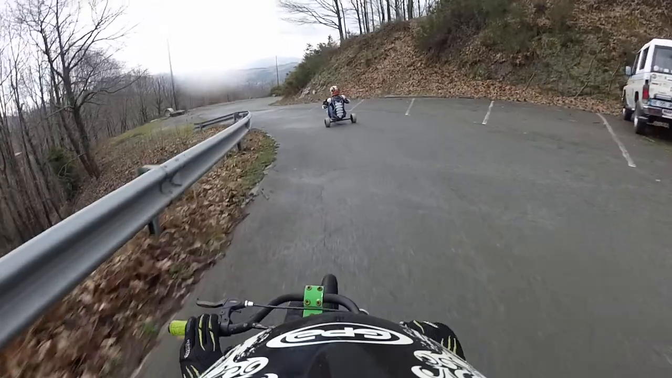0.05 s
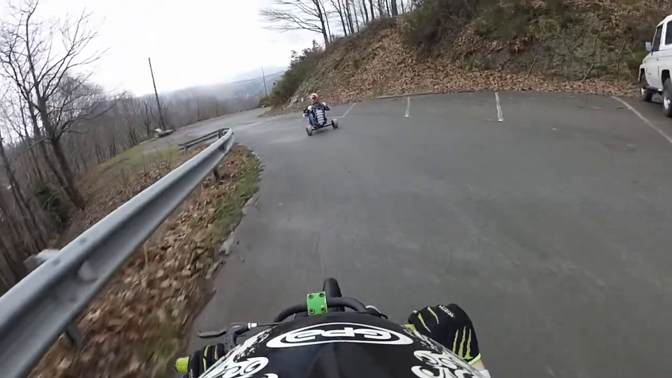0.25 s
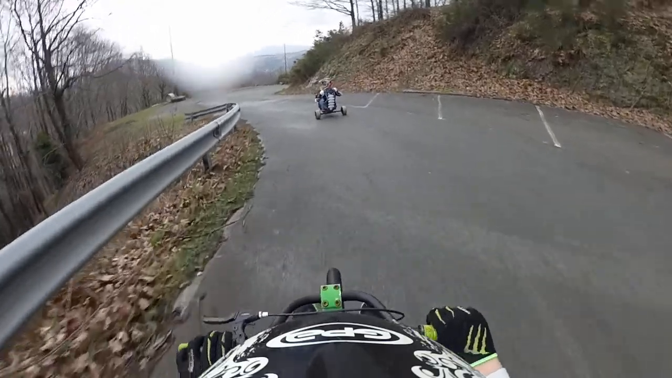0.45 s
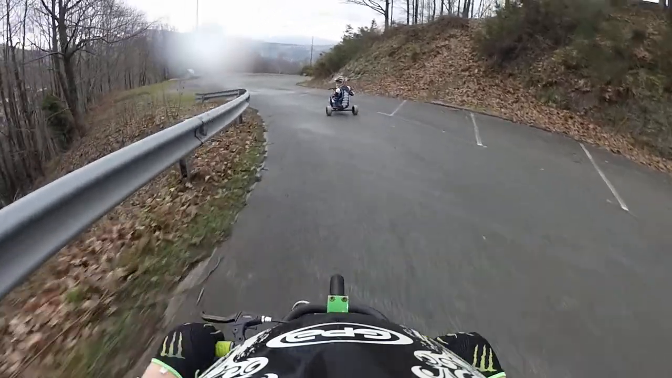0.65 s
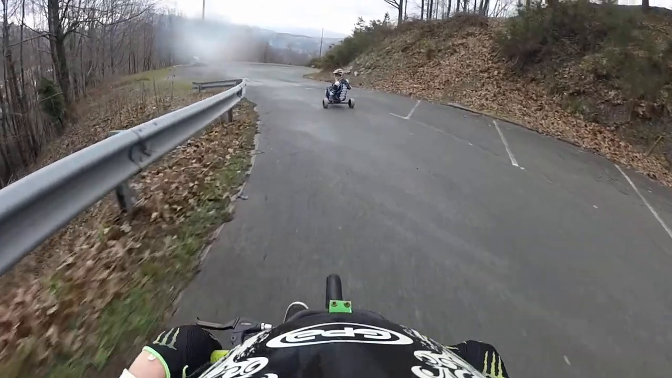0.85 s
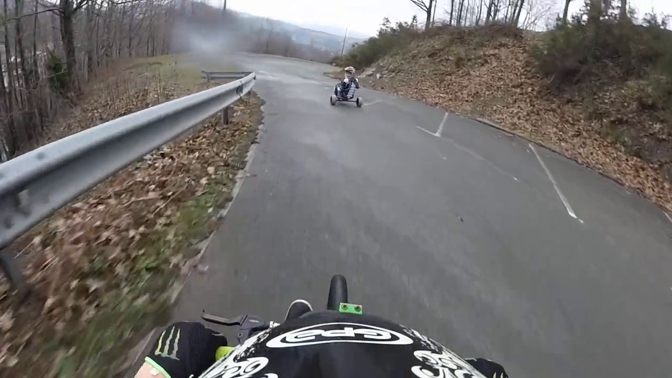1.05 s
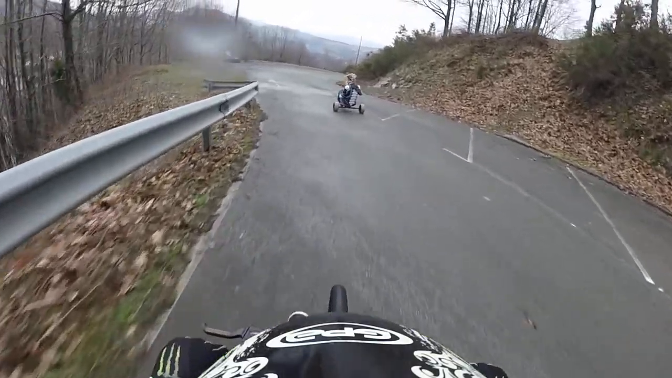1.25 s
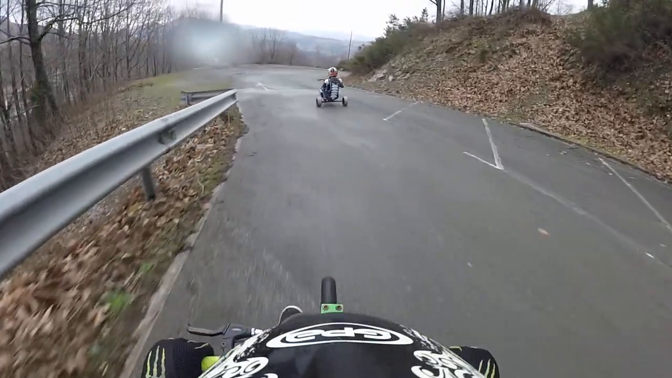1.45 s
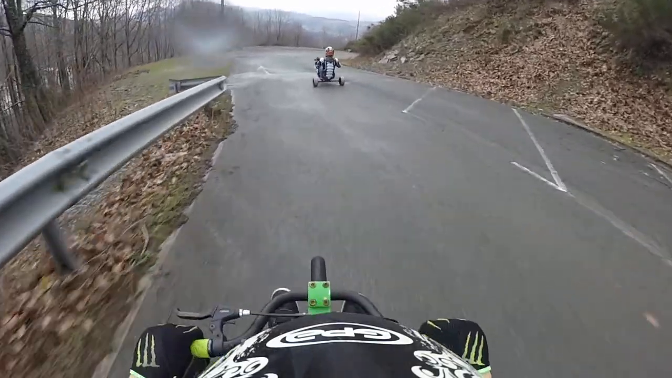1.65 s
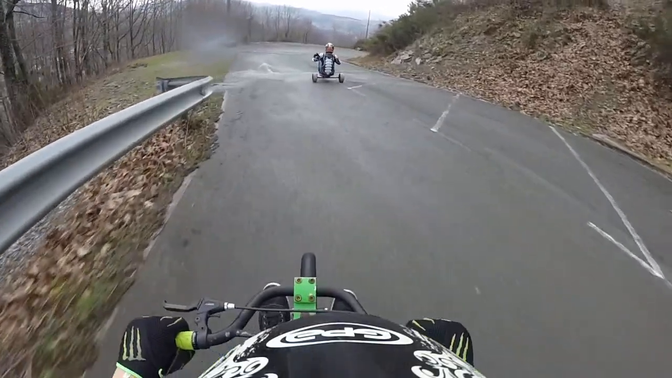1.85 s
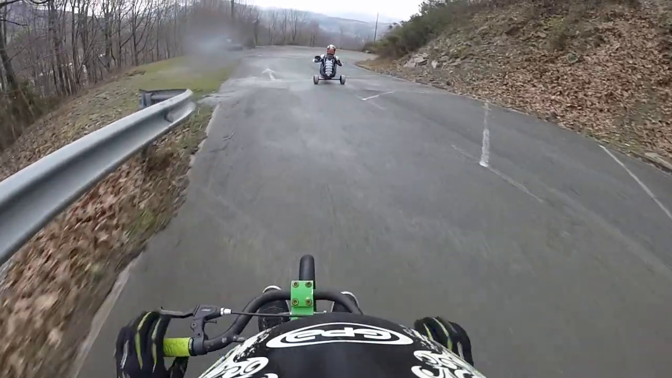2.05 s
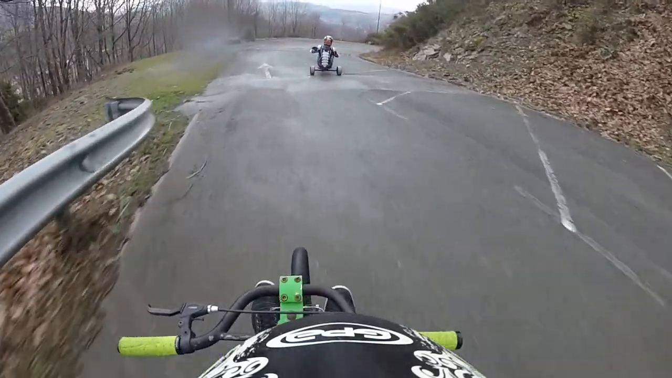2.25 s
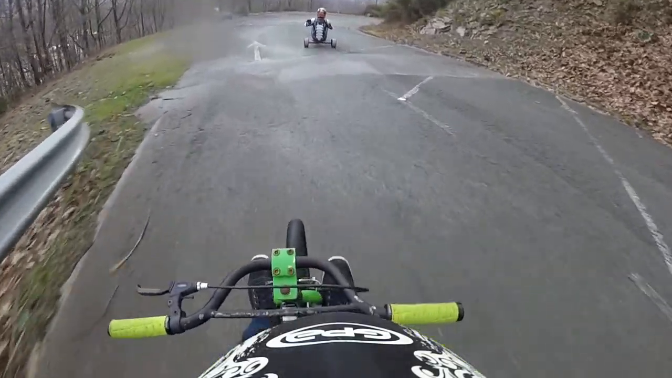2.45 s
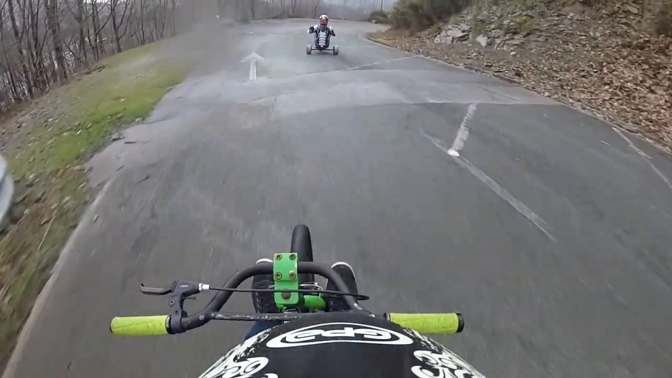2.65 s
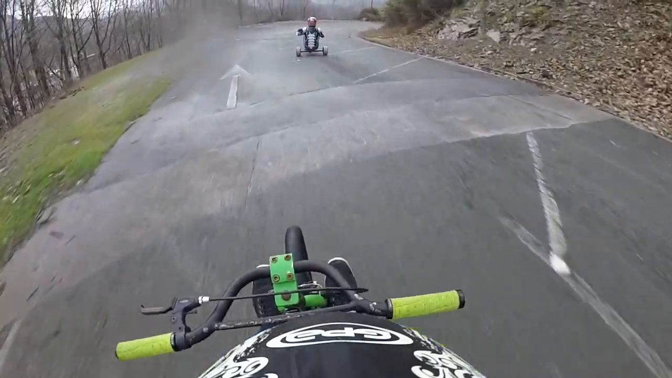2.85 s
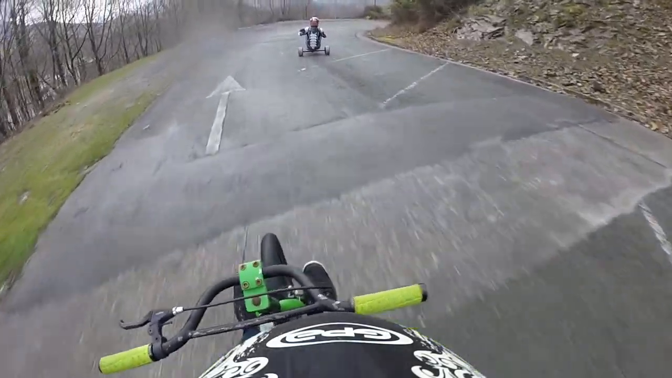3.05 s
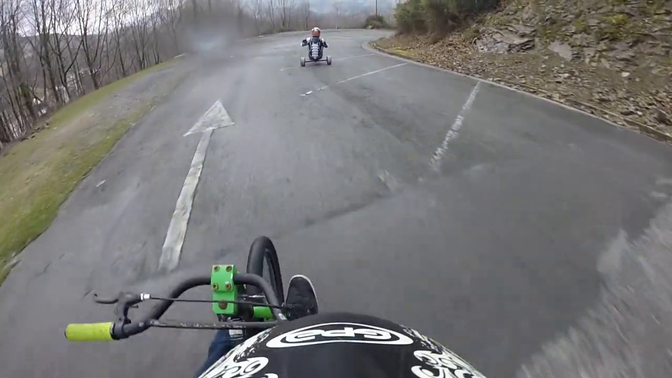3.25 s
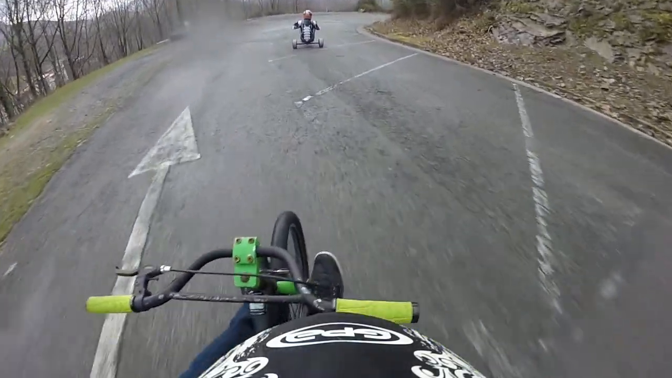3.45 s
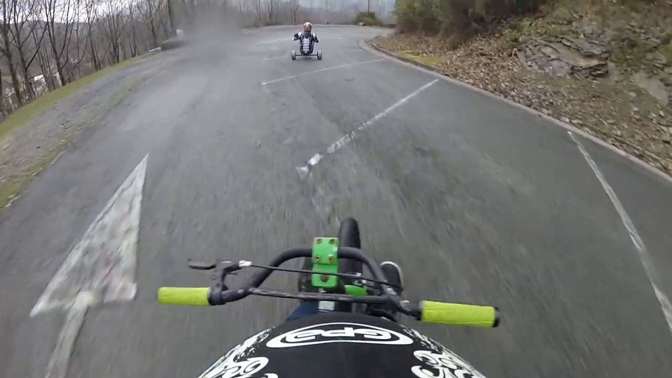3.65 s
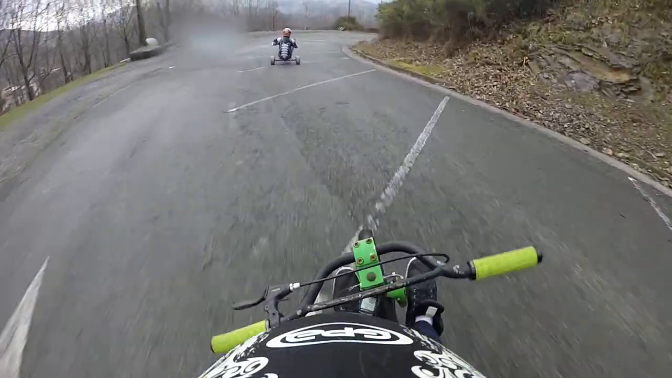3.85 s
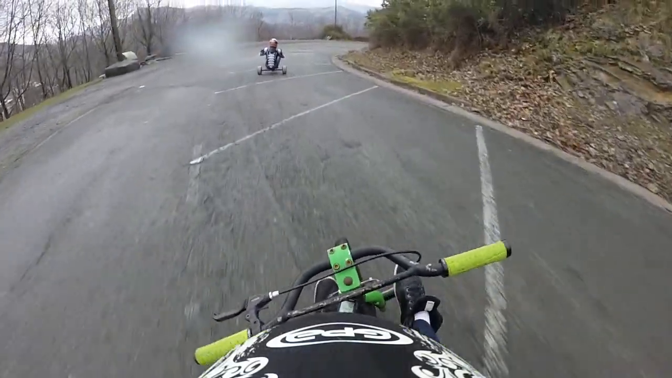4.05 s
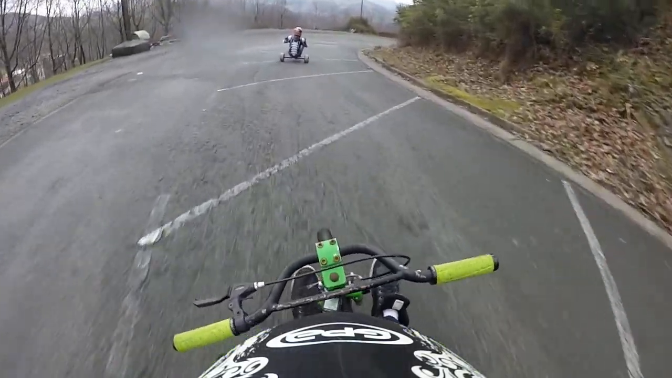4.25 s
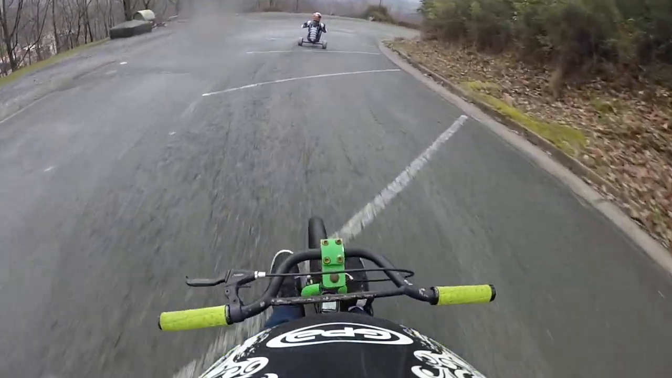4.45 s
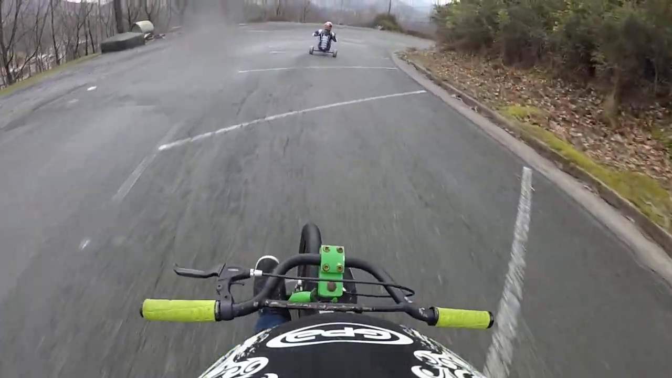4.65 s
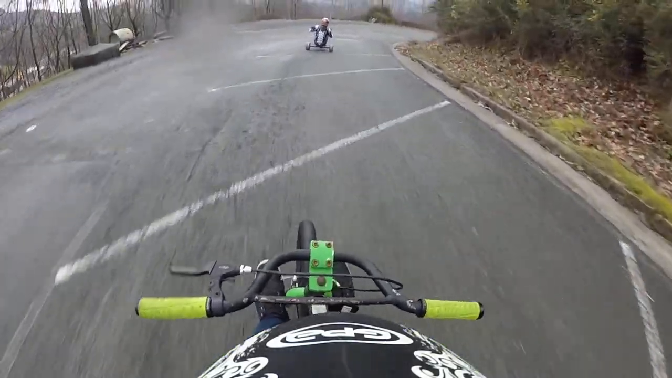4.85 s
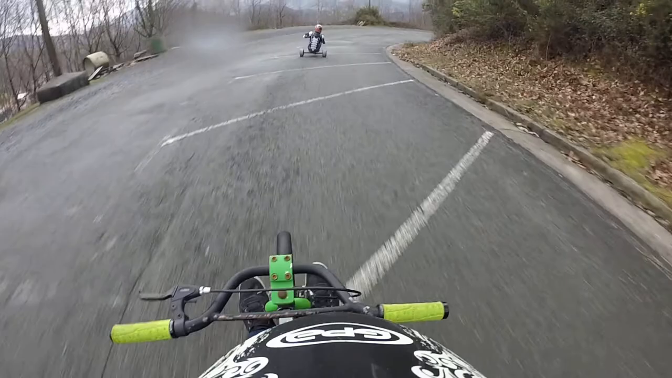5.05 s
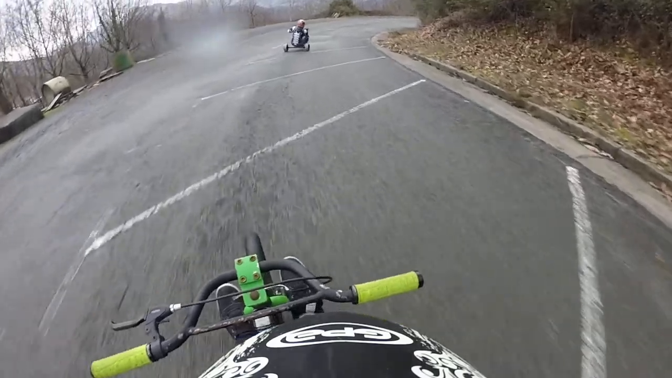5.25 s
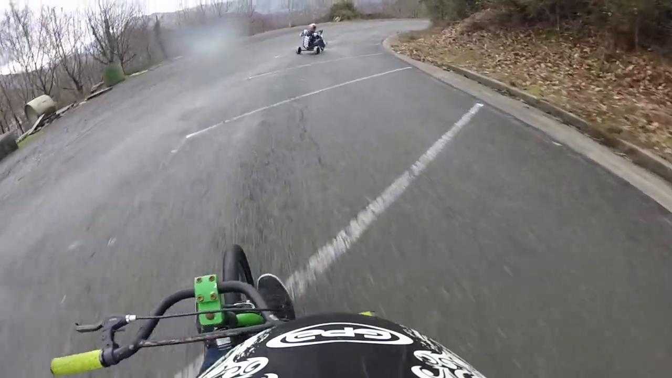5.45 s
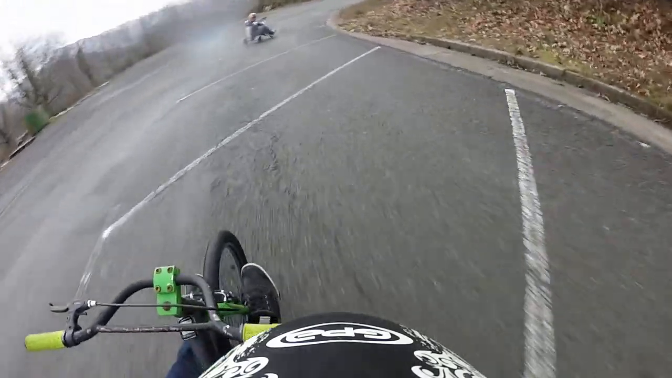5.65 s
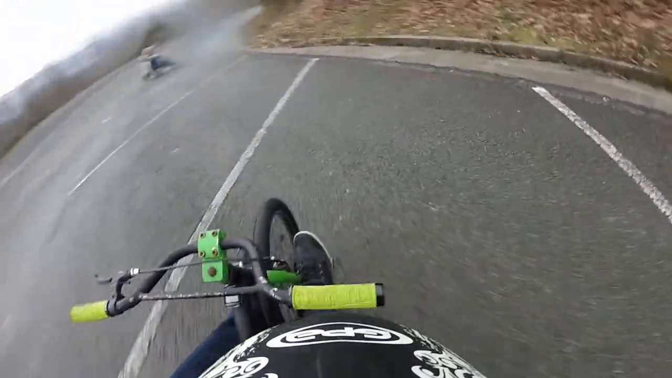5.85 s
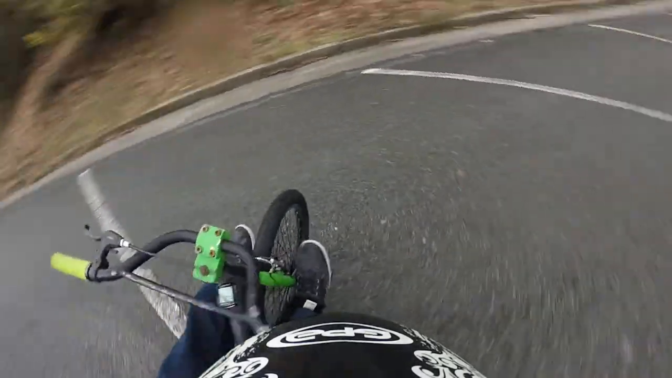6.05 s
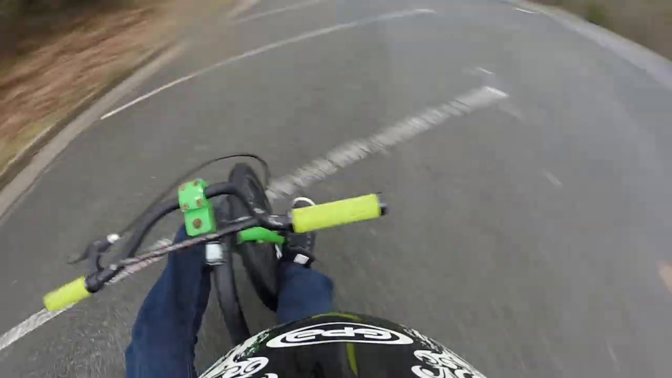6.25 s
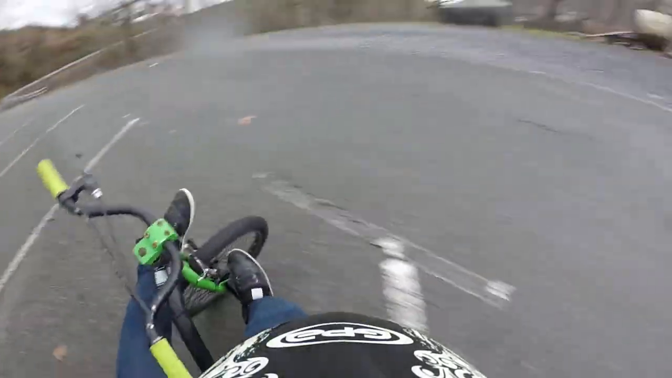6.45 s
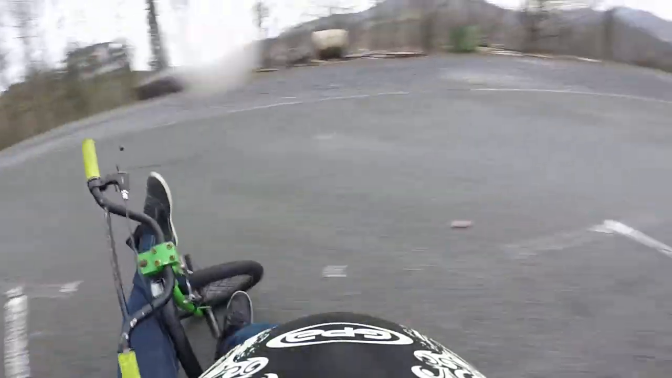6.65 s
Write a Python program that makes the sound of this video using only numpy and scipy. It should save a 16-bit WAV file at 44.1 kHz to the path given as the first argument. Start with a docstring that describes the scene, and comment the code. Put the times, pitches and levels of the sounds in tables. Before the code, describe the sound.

Close, outdoor sound from a helmet microphone on a fast trike. From the start, hard plastic wheels give a continuous grainy, hollow rattle with a fine scrape, over a deep rumble and light wind buffeting. The first half second is softer, with a slight slip; then the rolling strengthens. Between 0.5 and 1.7 seconds grit crackles and damp specks tick. Rough paving thickens the rumble from about 2.1, with a bump at 2.5. At 3.1 to 3.6 several low thuds rattle the frame, with stone clacks and a gust. A short scrape swells near 3.9 and a longer mild one toward 4.8, with sharp grit snaps around 5.2. A jolt at 5.7 leads into a harsh, juddering, hissing slide peaking near 6.1; at 6.45 comes the heaviest thump, with crunching grit, gusting wind and renewed skidding until the end at about 6.7.

```python
"""Asphalt road, from the helmet of a rider on a fast drift trike.
Random taps of the road's grain ring the hard plastic rear wheels and shake the frame; both are banks of resonances.
Grit crackles and cracks, stones clack, damp specks tick: short noise bursts, most rung by the wheels.
Bumps and rough paving jolt the trike; sideways slides scrape, hiss and judder, the hardest near the end.
Low-frequency noise in gusts is wind at the microphone."""
import sys
import numpy as np
from scipy import signal
from scipy.fft import rfft, irfft, next_fast_len
from scipy.io import wavfile
from scipy.ndimage import uniform_filter1d, map_coordinates

SR = 44100
rng = np.random.default_rng(int(sys.argv[2]) if len(sys.argv) > 2 else 0)


def put_to_file(sound):
    """Save the sound as 16-bit audio at rate SR, in the file named by the first command-line argument."""
    columns = np.atleast_2d(sound).T  # one column per channel
    safe = np.clip(columns, -1, 1)
    whole_steps = np.round(safe * 32767)
    wavfile.write(sys.argv[1], SR, whole_steps.astype(np.int16))


N = 295470  # samples


def amp(db):
    """Decibels to gain."""
    return 10 ** (np.asarray(db) / 20)


def unit(x):
    """Scale to rms 1."""
    return x / np.sqrt(np.mean(x ** 2) + 1e-20)


def together(db, gain):
    """Level in dB of a steady part (dB) and an added part (gain) whose powers sum."""
    return 20 * np.log10(np.hypot(amp(db), gain))


def wobble(knots_per_s):
    """Smooth random curve through Gaussian knots."""
    knots = rng.standard_normal(int(N * knots_per_s / SR) + 4)
    return map_coordinates(knots, [np.arange(N) * knots_per_s / SR])


def colour(points, modes=(), size=8192):
    """Minimum-phase impulse response of a broad spectrum with resonances standing on it."""
    hz = np.fft.rfftfreq(size, 1 / SR)
    point_hz, point_db = np.transpose(points)
    power = amp(np.interp(np.log(hz + 1), np.log(point_hz), point_db)) ** 2
    for centre_hz, half_width_hz, db in modes:
        resonance = amp(db) / (1 + ((hz - centre_hz) / half_width_hz) ** 2)
        power = power + resonance ** 2
    # fold the cepstrum forward in time: this makes the response causal
    cepstrum = irfft(np.log(power) / 2)
    cepstrum[1:size // 2] *= 2
    cepstrum[size // 2 + 1:] = 0
    return irfft(np.exp(rfft(cepstrum)))


def through(x, *responses):
    """Convolve x with each response in turn, keeping its length."""
    for response in responses:
        x = signal.oaconvolve(x, response[:len(x)])[:len(x)]
    return x


def grains(rate, spread_db):
    """Tiny impacts at random moments, rate per second, random sign, clipped log-normal size."""
    hit = rng.random(N) < rate / SR
    sign = np.sign(rng.standard_normal(N))
    size_db = spread_db * np.clip(rng.standard_normal(N), -2.5, 2.5)
    return hit * sign * amp(size_db)


def burst(length_s, size=2048):
    """Force of a stone giving way: noise with a sharp rise and a short crumbling."""
    u = np.arange(size) / SR / max(length_s, 1e-4)
    return rng.standard_normal(size) * np.sqrt(u) * np.exp(-2 * u)


def add(track, s, sound):
    """Mix a sound in at s seconds."""
    part = track[max(round(s * SR), 0):][:len(sound)]
    part += sound[:len(part)]


def patchy(x, depth_db, size=1024):
    """The colour shifts in patches of time and frequency as the worn tread turns and the rider leans."""
    z = signal.stft(x, nperseg=size)[2]
    field = uniform_filter1d(rng.standard_normal(z.shape), size=5, axis=0)
    field = uniform_filter1d(field, size=12, axis=1)
    return signal.istft(z * amp(depth_db * unit(field)), nperseg=size)[1][:N]


SWELL_SHAPE = 1.8  # 1 = pointed, 2 = round


def swells(rows):
    """Gain of events that swell to a peak and die away."""
    t = np.arange(N) / SR
    gain = 0
    for s, rise_s, fall_s, db in rows:
        distance = np.abs((t - s) / np.where(t < s, rise_s, fall_s))
        gain = gain + amp(db) * np.exp(-distance ** SWELL_SHAPE)
    return gain


EDGE_S = 0.059  # time to roll onto a new surface


def stretch(start_s, end_s):
    """1 while the wheels are on a stretch of road, 0 off it, ramped at the edges."""
    t = np.arange(N) / SR
    return np.clip(.5 + np.minimum(t - start_s, end_s - t) / EDGE_S, 0, 1)


# Spectrum of the taps. Each row: frequency in Hz, relative level in dB.
ROLLING_SPECTRUM = [(700, 1), (1900, 4.5), (2500, -5.5), (3500, -1), (6000, -15), (15000, -4)]


def rolling(wheel, level_db):
    """The asphalt's chippings tap the wheels, whose load flutters."""
    taps = grains(rate=3500, spread_db=3.5) * amp(0.71 * wobble(45))
    return amp(level_db) * unit(through(taps, colour(ROLLING_SPECTRUM), wheel))


# Spectrum of the catches. Each row: frequency in Hz, relative level in dB.
SCRAPING_SPECTRUM = [(700, -2), (1300, -15), (1800, -12.5), (2400, -0.5), (3200, -1), (4000, 0.5),
                     (6000, 0), (8000, -6.5), (15000, -5.5)]


def scraping(wheel, level_db):
    """Sideways slip tears at the plastic in finer, sharper catches."""
    flutter_db = 1.06 * wobble(70) + 0.32 * wobble(17)
    catches = grains(rate=5000, spread_db=5) * amp(flutter_db)
    scrape = through(catches, colour(SCRAPING_SPECTRUM), wheel)
    return amp(level_db) * unit(patchy(scrape, depth_db=2.5))


# The rear wheels step out sideways.
# Each row: time of the widest slip in seconds, rise in seconds, fall in seconds, slip in dB, sand hiss in dB.
SLIDE_EVENTS = [(.2, 0.17, 0.47, -19.5, -61), (3.9, .2, 0.28, -13, -50), (4.82, 0.56, 0.17, -16.5, -75),
                (6.13, 0.25, 0.18, -0.5, -39.5), (6.69, 0.33, .2, -6, -47.5)]


def slides():
    """Gains of wheel slip and of the sand hiss under it, swelling with each slide."""
    slip = swells([(s, rise_s, fall_s, slip_db) for s, rise_s, fall_s, slip_db, _ in SLIDE_EVENTS])
    sand = swells([(s, rise_s, fall_s, sand_db) for s, rise_s, fall_s, _, sand_db in SLIDE_EVENTS])
    return slip, sand


# Spectrum of the sand's rasp. Each row: frequency in Hz, relative level in dB.
HISS_SPECTRUM = [(1500, -22), (3000, -15.5), (4000, -16), (5400, 5.5), (7500, 4.5), (9000, 5.5),
                 (15000, -9)]


def skid_hiss(wheel, level_db):
    """The finest sand rasps under the plastic as flickering noise, loud in a hard slide."""
    rasp = rng.standard_normal(N) * amp(1.7 * wobble(90))
    hiss = through(rasp, colour(HISS_SPECTRUM), wheel)
    return amp(level_db) * unit(patchy(hiss, depth_db=0.5))


# Spectrum of the stick-slip. Each row: frequency in Hz, relative level in dB.
JUDDER_SPECTRUM = [(700, -18.5), (1300, -3.5), (1700, -2), (2600, -3.5), (4000, -11), (8000, -14)]


def judder(wheel, gain):
    """In a deep slide the plastic sticks and lets go, driving the wheel's lower rings hard."""
    slips = grains(rate=2200, spread_db=3.5) * amp(2.2 * wobble(60))
    return gain * unit(through(slips, colour(JUDDER_SPECTRUM), wheel))


# Spectrum of the road's rumble. Each row: frequency in Hz, relative level in dB.
RUMBLE_SPECTRUM = [(25, -18), (50, -8), (68, 0.5), (85, 0), (103, 0), (130, -2.5), (160, -5), (200, -21),
                   (300, -34.5), (800, -64.5)]
# The rider bouncing on the seat. Each row: resonance in Hz, half-width in Hz, relative level in dB.
SEAT_MODES = [(103.2, 5.9, 5)]


def ride(frame, rumble_db, frame_db):
    """The uneven road shakes rider and frame: random jolts through the resonances of each."""
    jolts = grains(rate=900, spread_db=2.5)
    rumble = amp(rumble_db) * unit(through(jolts, colour(RUMBLE_SPECTRUM, SEAT_MODES)))
    shake = amp(frame_db) * unit(through(grains(rate=2500, spread_db=3), frame))
    return rumble + shake


# Wind noise spectrum. Each row: frequency in Hz, relative level in dB.
WIND_SPECTRUM = [(8, 2.5), (18, 4.5), (40, 4), (60, -3.5), (120, -12.5), (400, -58)]
# Gusts. Each row: peak time in seconds, rise in seconds, fall in seconds, wind level in dB.
GUST_EVENTS = [(2.2, 0.39, 0.76, -42.5), (3.45, 0.18, 0.19, -34), (6.1, 0.32, .25, -30.5),
               (6.56, .18, 0.3, -29)]
HEADWIND_DB = -43


def wind():
    """A steady headwind buffets the microphone, with gusts as the rider turns."""
    level_db = together(HEADWIND_DB, swells(GUST_EVENTS))
    return amp(level_db) * unit(through(rng.standard_normal(N), colour(WIND_SPECTRUM)))


# Spectrum of crushed grit, small and coarse. Each row: frequency in Hz, relative level in dB.
GRIT_SPECTRUM = [(800, -42), (1800, -2), (3000, 8), (5000, 12), (7500, 16), (15000, 4.5)]


def loose_grit(wheel, level_db):
    """Small grains crackle under the wheels, each crumbling for a few milliseconds."""
    t = np.arange(SR // 20) / SR
    envelope = (1 - np.exp(-t / .0004)) * np.exp(-t / .0025)
    crumble = through(np.abs(grains(rate=38, spread_db=4.5)), envelope)
    crackle = crumble * patchy(rng.standard_normal(N), depth_db=5.5)
    treble = colour([(6000, 0), (10000, 3)], size=512)
    return amp(level_db) * unit(through(crackle, colour(GRIT_SPECTRUM), treble, wheel))


# Spectrum of the spatter. Each row: frequency in Hz, relative level in dB.
DROPLET_SPECTRUM = [(2000, -43), (3500, 1.5), (4800, 0), (6300, 2), (7400, 3), (8300, -21), (11000, -24.5),
                    (15000, -34)]
# The larger specks. Each row: start in seconds, peak in dB.
SPECK_EVENTS = [(0.0295, -37), (0.5082, -25.5), (0.8015, -28), (0.832, -26), (0.9712, -30), (0.995, -33),
                (1.0105, -28)]


def spatter(level_db):
    """Specks thrown off the damp road tick thinly in a high band: a few singly, the rest as a fizz."""
    specks, band = np.zeros(N), colour(DROPLET_SPECTRUM)
    for s, db in SPECK_EVENTS:
        tick = through(burst(length_s=0.002), band)
        add(specks, s, amp(db) * tick / np.abs(tick).max())
    fizz = through(grains(rate=1900, spread_db=9.0), band)
    return specks + amp(level_db) * unit(fizz)


# Stones and road edges that strike a wheel.
# Each row: start in seconds, rms level in dB, treble lift in dB, strongest ring in Hz.
KNOCK_EVENTS = [(0.061, -40, 15, 2370), (0.346, -39, 8, 1910), (1.152, -32, 14.5, 1760),
                (1.65, -36, 3, 1820), (2.299, -33.5, 8.5, 1760), (2.867, -36.5, 8, 2370),
                (3.117, -29, 10, 2470), (3.249, -38.5, 8.5, 2360), (3.332, -34, 12, 2610),
                (3.5325, -30, -13, 1820), (5.833, -29, -1, 1800), (6.1393, -33.5, 20, 2440)]
KNOCK_S = .0052  # how long a stone takes to give way


def knocks(wheel):
    """A stone or a road edge hits a wheel; where it lands decides which ring leads the clack."""
    track = np.zeros(N)
    for s, db, lift_db, ring_hz in KNOCK_EVENTS:
        tilt = [(600, 0.27), (2200, 0.58), (5500, lift_db), (12000, lift_db - 8.5)]
        contact = colour(tilt, [(ring_hz, 300, 8)], size=512)
        clack = through(burst(KNOCK_S), wheel, contact)
        add(track, s, amp(db) * unit(clack))
    return track


# Coarse grit crushed under a wheel, levels before the patchy colouring.
# Each row: start in seconds, peak in dB, top-octave lift in dB (hardness), crumbling time in seconds.
CRACK_EVENTS = [(0.105, -25.5, -9, 0.0031), (0.571, -29.5, 2, 0.0034), (0.639, -28.5, -13, 0.0046),
                (0.725, -28.5, -2, 0.006), (0.765, -23, -4, 0.0054), (0.871, -32, 5, .006),
                (1.038, -32, 5, 0.0038), (1.255, -43, 0, .0036), (1.27, -31.5, 12, 0.0058),
                (1.352, -27.5, 4, 0.0035), (1.508, -25, 7, 0.0079), (1.537, -23, 2, 0.0048),
                (1.677, -27, -4, .006), (1.785, -37, -2, .003), (2.198, -26, -4, 0.0094),
                (2.447, -31, 5, 0.0062), (2.6, -35, 12, .006), (2.667, -24, 0, 0.0047),
                (2.855, -24.5, 5, 0.0044), (2.948, -23.5, -1, 0.0046), (3.027, -26.5, 3, 0.0059),
                (3.753, -20.5, 1, 0.00234), (3.988, -25.5, 12, 0.0025), (4.107, -28.5, 9.5, 0.0062),
                (4.22, -29, -9, 0.0039), (4.514, -22.5, -1, 0.0028), (4.675, -25, -1, 0.0047),
                (4.694, -27, 6, .005), (5.197, -20.5, 3, 0.0042), (5.246, -20.5, 1, .004),
                (5.403, -28.5, 6, .0036), (6.475, -16.5, -7, 0.0045), (6.618, -21, -14, .003)]
CRUMBS_S, CRUMBS_DB = 0.022, -13  # the scatter after each snap, level against the snap's


def cracks(wheel):
    """Larger grains snap and their crumbs scatter; the harder the grain, the brighter its crack."""
    track, grit = np.zeros(N), through(wheel, colour(GRIT_SPECTRUM))
    for s, db, top_db, length_s in CRACK_EVENTS:
        hardness = colour([(7000, 0), (10000, top_db)], size=512)
        force = burst(length_s) + amp(CRUMBS_DB) * burst(CRUMBS_S)
        crack = through(force, grit, hardness)
        add(track, s, amp(db) * crack / np.abs(crack).max())
    return patchy(track, depth_db=3.0, size=128)


# Stretches of loose, damp grit. Each row: start in seconds, end in seconds, crackle in dB, spatter in dB.
GRITTY_STRETCHES = [(0.607, 1.74, -51, -59.5), (2.123, 3.123, -51, -72), (3.3, 3.633, -43, -61),
                    (3.736, 4.265, -57, -59), (5.618, 5.95, -45, -63), (6.418, 6.75, -41, -44)]
GRIT_DB, DRY_SPATTER_DB = -55, -62  # crackle and spatter present all along the road


def gritty():
    """Levels of crackle and of spatter in dB, as the wheels run through the grit."""
    gains = 0
    for start_s, end_s, *levels_db in GRITTY_STRETCHES:
        gains = gains + np.outer(amp(levels_db), stretch(start_s, end_s))
    crackle, specks = gains
    return together(GRIT_DB, crackle), together(DRY_SPATTER_DB, specks)


# Bumps that jolt the whole trike.
# Each row: start in seconds, swing level in dB, pitch in Hz, rattle peak in dB against the swing.
BUMP_EVENTS = [(1.808, -26.5, 88, -31), (2.512, -19, 70, -18), (3.158, -23, 88, -20),
               (3.308, -17, 105, -16), (3.334, -27, 111, -3), (3.393, -17, 109, -21),
               (3.428, -19, 105, -10.5), (3.531, -18.5, 104, -14), (3.558, -22.5, 112, -9),
               (5.708, -19, 111, -14.5), (6.129, -20, 100, -19), (6.452, -9.5, 106, -20.5)]


def bumps(frame):
    """Each jolt swings seat and rider through a few deep cycles and rattles the frame."""
    track, t = np.zeros(N), np.arange(SR // 5) / SR
    u = t / 0.0095  # the swing is widest after 9.5 ms
    for s, db, hz, rattle_db in BUMP_EVENTS:
        swing = -(u * np.exp(1 - u)) ** 2 * np.sin(2 * np.pi * hz * t)
        rattle = through(burst(length_s=0.017, size=len(t)), frame)
        rattle = amp(rattle_db) * rattle / np.abs(rattle).max()
        add(track, s, amp(db) * (swing + rattle))
    return track


# Stretches of rough paving. Each row: start in seconds, end in seconds, extra rumble in dB,
# extra frame shake in dB, extra wheel ring in dB.
ROUGH_STRETCHES = [(2.063, 3.29, 3.5, .5, 0.5), (3.265, 3.478, 6, 6, 0), (3.526, 3.638, 10.5, 5, 1.5),
                   (4.26, 4.377, 6.5, 5, 4), (4.547, 4.97, 0, 2, 1), (5.665, 6.306, 4.5, 2.5, 1),
                   (6.299, 6.75, 10.5, 4, -1)]


def paving():
    """What the rough stretches add to rumble, frame shake and wheel ring, in dB."""
    return sum(np.outer(extra_db, stretch(start_s, end_s)) for start_s, end_s, *extra_db in ROUGH_STRETCHES)


# How hard speed and load drive the wheels. Each row: time in seconds, drive in dB (only its shape counts).
DRIVE_CURVE = [(0.0, -45.5), (0.13, -46.5), (0.44, -47), (0.81, -40), (0.97, -41.5), (2.1, -39.5),
               (2.24, -38.5), (3.08, -38.5), (3.4, -35.5), (3.71, -39), (4.0, -37), (4.82, -35),
               (5.56, -35), (5.7, -36)]
SCRUB_DB = 3.5  # drive lost to sliding, in all


def drive(slip):
    """Drive in dB about its mean, less what the slides have scrubbed off so far."""
    s, db = np.transpose(DRIVE_CURVE)
    drive_db = np.interp(np.arange(N) / SR, s, db)
    return drive_db - drive_db.mean() - SCRUB_DB * np.cumsum(slip) / slip.sum()


# Broad spectra of wheel and frame. Each row: frequency in Hz, relative level in dB.
WHEEL_BROAD = [(200, -63), (1000, -20.5), (1400, -29), (2100, -12), (4000, -23), (6400, -34), (7800, -36.5),
               (10500, -39), (13000, -45), (15500, -58)]
FRAME_BROAD = [(100, -32), (220, -1), (400, -6), (600, -5.5), (860, -8.5), (1300, -6), (2000, -7),
               (5000, -83)]
# Resonances of the plastic wheel, and of the steel frame and seat.
# Each row: resonance in Hz, half-width in Hz, relative level in dB.
WHEEL_MODES = [(712.6, 51, -13.5), (1767, 124.5, 1), (2378, 192, -4.5), (3056, 200, -10.5), (3630, 95, -18),
               (4685, 480, -20.5), (5470, 230, -24.5), (6030, 300, -23.5), (7010, 230, -30.5),
               (9840, 310, -36.5)]
FRAME_MODES = [(239.2, 26, 5), (339, 30, 1.5), (385, 39, 0), (488, 91, -2), (743, 78, -1.5), (948, 40, -5)]
ROLL_DB, SCRAPE_DB, HISS_DB = -37, -40.5, -65.5  # running straight on clean asphalt, at the mean drive
RUMBLE_DB, SHAKE_DB = -36.5, -50  # on smooth asphalt, at the mean drive
ROLL_GROWS, SCRAPE_GROWS, SHAKE_GROWS = 1.01, 0.69, 0.36  # dB for each dB of drive
SLIDE_JUDDER_DB, SLIDE_SCRAPE_DB = -28, -27  # at full slip
SLIDE_GRIT_DB = -4  # against the sand hiss
CLUMP_DB = 3  # how unevenly sand lies on the road


def scene():
    """Drive, slip and surface set the contact levels; wheel sounds share one set of resonances."""
    wheel, frame = colour(WHEEL_BROAD, WHEEL_MODES), colour(FRAME_BROAD, FRAME_MODES)
    slip, sand = slides()
    drive_db = drive(slip)
    extra_rumble_db, extra_shake_db, extra_ring_db = paving()
    crackle_db, spatter_db = gritty()

    roll_db = ROLL_DB + ROLL_GROWS * drive_db + extra_ring_db
    scrape_db = together(SCRAPE_DB + SCRAPE_GROWS * drive_db, amp(SLIDE_SCRAPE_DB) * slip)
    hiss_db = together(HISS_DB + drive_db + CLUMP_DB * wobble(12), sand)
    grit_db = together(crackle_db, amp(SLIDE_GRIT_DB) * sand)
    rumble_db = RUMBLE_DB + extra_rumble_db
    shake_db = SHAKE_DB + SHAKE_GROWS * drive_db + extra_shake_db

    road = rolling(wheel, roll_db) + scraping(wheel, scrape_db)
    skid = skid_hiss(wheel, hiss_db) + judder(wheel, amp(SLIDE_JUDDER_DB) * slip)
    stones = loose_grit(wheel, grit_db) + cracks(wheel) + knocks(wheel)
    body = ride(frame, rumble_db, shake_db) + bumps(frame)
    return (road + skid + stones + spatter(spatter_db) + body + wind())[None]


TOP_HZ = 15500


def record(dry):
    """Band limit: nothing passes from TOP_HZ up."""
    m = next_fast_len(N + SR // 2)
    kept = np.fft.rfftfreq(m, 1 / SR) < TOP_HZ
    return irfft(rfft(dry, m) * kept, m)[..., :N]


dry = scene()
out = record(dry)
put_to_file(out)
```